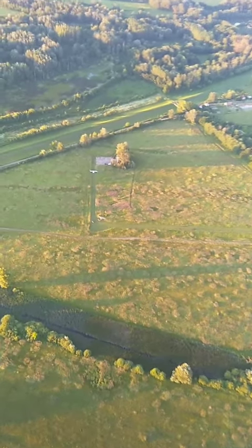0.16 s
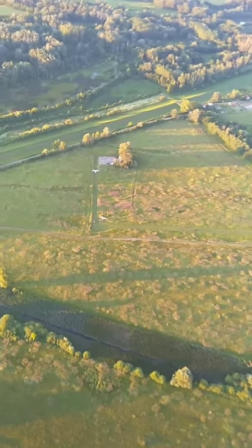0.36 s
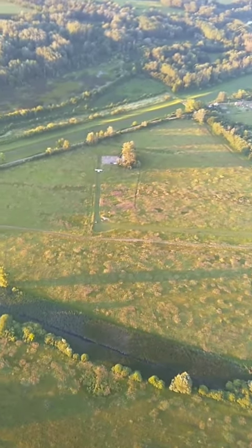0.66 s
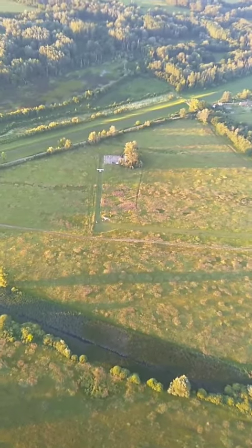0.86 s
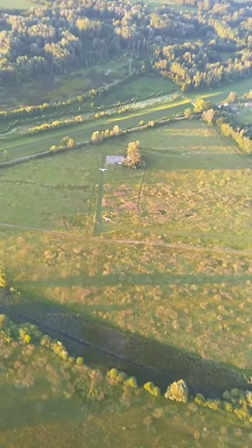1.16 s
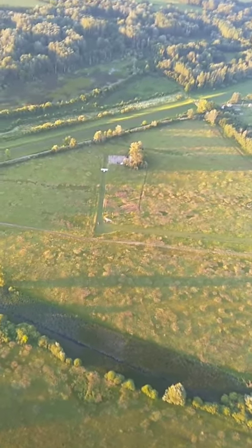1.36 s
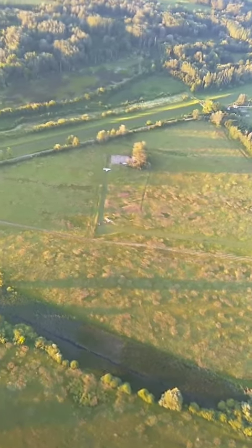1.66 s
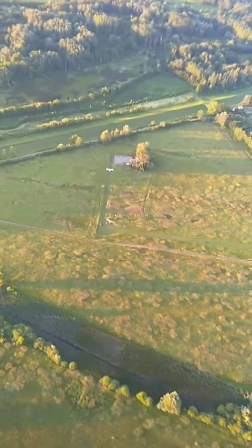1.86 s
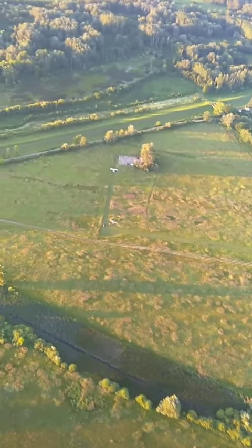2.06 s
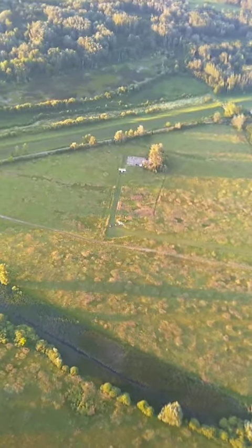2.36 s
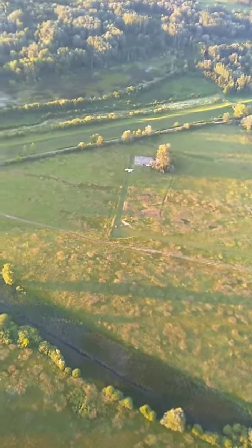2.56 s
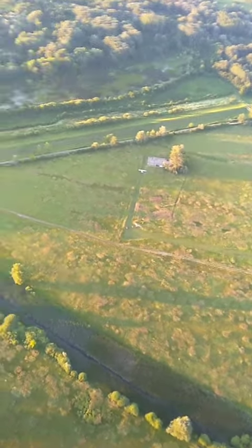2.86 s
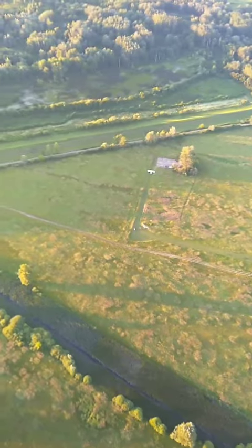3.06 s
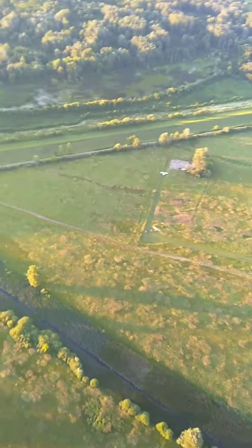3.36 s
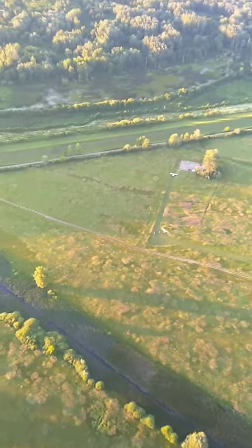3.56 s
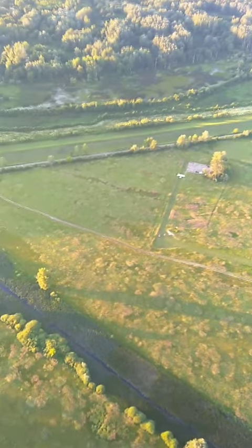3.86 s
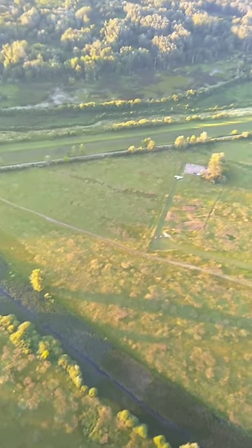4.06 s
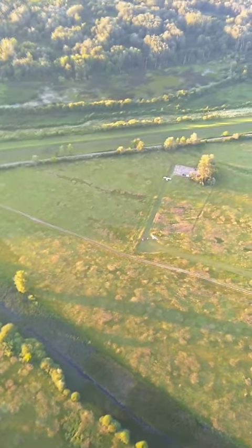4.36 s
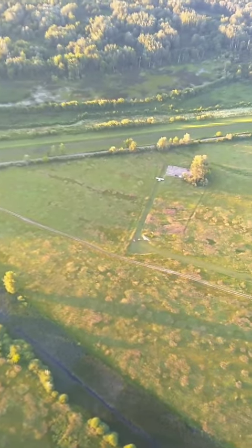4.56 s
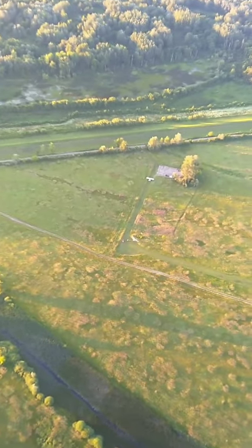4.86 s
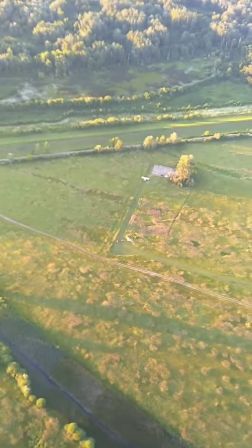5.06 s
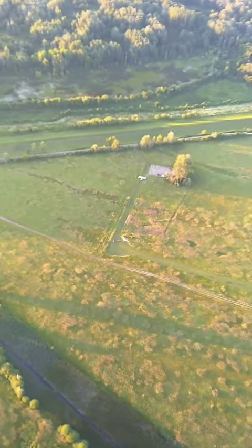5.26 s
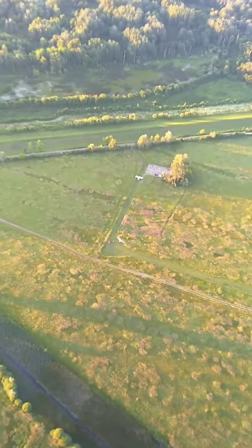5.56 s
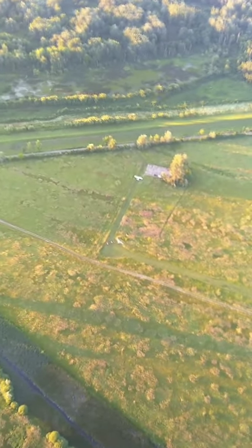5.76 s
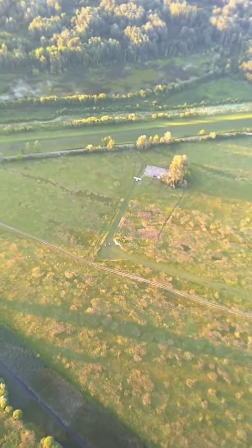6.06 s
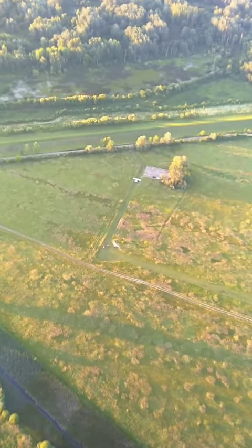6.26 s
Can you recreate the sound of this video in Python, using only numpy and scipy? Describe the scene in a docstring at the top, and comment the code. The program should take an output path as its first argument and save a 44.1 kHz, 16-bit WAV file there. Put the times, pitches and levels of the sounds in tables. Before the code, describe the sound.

A gas burner hisses steadily overhead, then soft wind thumps grow into hard puffs and an unbroken, fluttering, crackling roar of air on the microphone.

```python
"""In the basket of a hot-air balloon, a propane burner hisses overhead, steadily at first.
After a click at the abrupt start, turbulent air reaches the microphone: a few soft thumps, then hard
puffs, then an unbroken, fluttering roar with sharp little cracks, under which the hiss sinks. The hiss
and the smallest eddies are shaped noise, the larger eddies sums of sliding tones, the puffs and cracks
short bursts of tone and noise. A limiter holds the peaks."""
import sys
import numpy as np
from scipy import signal
from scipy.fft import rfft, irfft, next_fast_len
from scipy.io import wavfile
from scipy.ndimage import uniform_filter1d, minimum_filter1d, map_coordinates

SR = 44100
rng = np.random.default_rng(int(sys.argv[2]) if len(sys.argv) > 2 else 0)


def bounce(signal):
    """Save signal as a 16-bit WAV file at the path given by the first command-line argument."""
    frames = np.transpose(np.atleast_2d(signal))
    limited = np.clip(frames, -1, 1)
    pcm = np.round(limited * 32767).astype(np.int16)
    wavfile.write(sys.argv[1], SR, pcm)


N = 282681


def amp(db):
    """Decibels to gain."""
    return 10 ** (np.asarray(db) / 20)


def unit(x):
    """Scaled to rms 1."""
    return x / np.sqrt(np.mean(x ** 2) + 1e-20)


def stereo(mid, side, side_db):
    """Left and right from a middle and a side signal."""
    return mid + amp(side_db) * np.array([side, -side])


def time_around(half_s):
    """Seconds from -half_s to half_s, one per sample."""
    half = int(round(half_s * SR))
    return np.arange(-half, half) / SR


def along(points, hz):
    """(Hz, value) points read on a log frequency axis."""
    point_hz, value = np.transpose(points)
    return np.interp(np.log(hz + 1), np.log(point_hz + 1), value)


def curve(points):
    """(s, value) points read at every sample."""
    point_s, value = np.transpose(points)
    return np.interp(np.arange(N) / SR, point_s, value)


def wobble(rate_hz):
    """Smooth random curve with rate_hz knots a second."""
    knots = rng.standard_normal(int(N * rate_hz / SR) + 4)
    return map_coordinates(knots, [np.arange(N) * rate_hz / SR])


def filtered(x, response):
    """x times a response of frequency, zero-padded against wrap-around."""
    size = next_fast_len(x.shape[-1] + 8192)
    spectrum = rfft(x, size) * response(np.fft.rfftfreq(size, 1 / SR))
    return irfft(spectrum, size)[..., :x.shape[-1]]


def noise(spectrum, side_db):
    """Stereo noise whose middle has rms 1; side_db sets its width."""
    mid, side = filtered(rng.standard_normal((2, N)), lambda hz: amp(along(spectrum, hz)))
    return stereo(unit(mid), unit(side), side_db)


def even(x, span_s):
    """x with its swells slower than span_s smoothed out."""
    size = max(int(span_s * SR), 2)
    power = uniform_filter1d(uniform_filter1d(np.mean(x ** 2, axis=0), size), size)
    return x / np.sqrt(np.abs(power) + 1e-9)


def add(track, start_s, sound):
    """Mix a sound into a track from start_s."""
    start = int(round(start_s * SR))
    lo, hi = max(start, 0), min(start + sound.shape[-1], N)
    track[..., lo:hi] += sound[..., lo - start:hi - start]


ARRIVAL_S, RISE_S = 2.885, 0.018  # onset of the unbroken turbulence
# Strength of the unbroken turbulence. Each row: time in seconds, gain in dB.
FLOW_GAIN = [(2.9, -1), (2.95, -2.5), (2.98, -9), (3.04, 2.5), (3.24, 1), (3.42, -0.5), (3.66, -2),
             (3.88, 2), (4.12, 0), (4.35, 0), (4.54, 0.5), (4.66, -2), (4.8, 1), (4.9, -3.5), (5.02, -1.5),
             (5.22, 0), (5.31, -2.5), (5.53, 2.5), (5.62, -2.5), (5.8, 3), (5.96, -2), (6.1, 0.5),
             (6.28, 1.5), (6.35, 4)]
# Gaps between gusts. Each row: centre in seconds, gain at the centre in dB, half length in seconds.
GUST_GAPS = [(2.978, -15, 0.012), (3.09, -5, 0.011), (3.199, -4.5, 0.011), (3.469, 0, 0.01),
             (3.523, -3, .012), (3.668, -4, 0.0099), (3.755, -3, 0.014), (4.2, -2, 0.0093),
             (4.277, -5.5, 0.011), (4.377, -3.5, .01), (4.51, -5, 0.013), (4.563, -5, 0.013),
             (4.95, 0, 0.0092), (5.223, -8, 0.016), (5.39, -4.5, 0.012), (5.419, -5.5, 0.013),
             (5.542, -7, 0.015), (6.209, -12.5, 0.0099), (6.307, -6, 0.011)]


def flowing():
    """Gain of the turbulence: none at first, then about 1, with gaps between the gusts."""
    flow_db = curve(FLOW_GAIN)
    t = time_around(0.1)
    for centre_s, depth_db, half_s in GUST_GAPS:
        add(flow_db, centre_s + t[0], depth_db * np.exp(-(t / half_s) ** 2))
    onset = np.clip((np.arange(N) / SR - ARRIVAL_S) / RISE_S, 0, 1)
    return onset * amp(flow_db)


# Spectra of the large, middle and small eddies. Each row: frequency in Hz, relative level in dB.
LARGE_SPECTRUM = [(20, -66), (50, -71), (70, -49), (100, -5.5), (130, 5.5), (220, 4.5), (280, -1.5),
                  (380, -18), (700, -72)]
MIDDLE_SPECTRUM = [(120, -62), (230, -3.5), (300, 2.5), (450, -1), (600, -4), (800, -7), (1000, 5),
                   (1250, -9), (2000, -80)]
SMALL_SPECTRUM = [(350, -42), (600, 2), (780, 11), (1000, 3.5), (1400, 0), (2400, -21), (4500, -40),
                  (10000, -45)]
# Upper edge of the roar, swept up by gusts. Each row: time in seconds, highest eddy pitch in Hz.
UPPER_EDGE = [(2.881, 530.0), (2.899, 990), (2.935, 890), (2.971, 1200.0), (2.989, 490.0), (3.007, 1000.0),
              (3.025, 780.0), (3.109, 654), (3.133, 996), (3.169, 670), (3.247, 1110.0), (3.265, 816),
              (3.295, 900.0), (3.336, 583), (3.408, 910.0), (3.444, 565), (3.588, 560.0), (3.618, 790.0),
              (3.672, 570), (3.767, 806), (3.803, 650.0), (3.893, 870), (3.971, 590), (4.049, 890),
              (4.121, 530.0), (4.175, 890), (4.204, 640), (4.576, 588), (4.588, 780.0), (4.665, 620),
              (4.803, 820), (4.869, 750), (4.881, 430.0), (4.899, 730.0), (4.941, 430.0), (5.013, 830.0),
              (5.114, 510.0), (5.138, 870), (5.228, 490.0), (5.258, 760), (5.557, 550), (5.569, 740),
              (5.719, 690.0), (5.857, 720), (5.899, 587), (6.06, 660.0), (6.108, 870), (6.15, 630.0),
              (6.168, 970), (6.21, 580.0), (6.258, 720.0), (6.27, 460), (6.348, 716), (6.407, 674)]
LARGE_DB, MIDDLE_DB = -15.5, -15
SMALL_DB, SMALL_DB_PER_OCTAVE, USUAL_EDGE_HZ = -35.5, 4, 700  # small eddies grow as the edge climbs
SURGE_RATE_HZ, SURGE_DB = 10, 1.8  # random tilt between large and middle eddies
SPURT_RATE_HZ, SPURT_DB = 22, 2  # random swing of the small eddies, and its limit
NARROW_DB, WIDE_DB, SPREAD_S = -47, -1, 1  # side gain at arrival, and SPREAD_S later


def turbulence():
    """Eddies of three sizes; gusts push the roar up in pitch, and the smallest eddies come in spurts."""
    edge_hz = curve(UPPER_EDGE)
    flutter = wobble(90)
    surge_db = SURGE_DB * wobble(SURGE_RATE_HZ)

    large = swarm(LARGE_SPECTRUM, edge_hz, side_db=-17, rate_hz=420) * amp(0.34 * flutter)
    large = even(large, span_s=0.022) * amp(LARGE_DB + surge_db)

    middle = swarm(MIDDLE_SPECTRUM, edge_hz, side_db=-10.5, rate_hz=950) * amp(2 * flutter)
    middle = even(middle, span_s=0.035) * amp(MIDDLE_DB - surge_db)

    small = noise(SMALL_SPECTRUM, side_db=-10.5) * amp(4.8 * flutter + 3.3 * wobble(260))
    small_db = SMALL_DB + SMALL_DB_PER_OCTAVE * np.log2(edge_hz / USUAL_EDGE_HZ)
    spurt_db = SPURT_DB * np.tanh(wobble(SPURT_RATE_HZ))
    small = even(small, span_s=0.019) * amp(small_db + spurt_db)

    left, right = (large + middle + small) * flowing()
    # the flow meets both ports alike at first, then spreads
    width_db = curve([(ARRIVAL_S, NARROW_DB), (ARRIVAL_S + SPREAD_S, WIDE_DB)])
    spread = stereo((left + right) / 2, (left - right) / 2, width_db)
    return spread * amp([[-.4], [.4]])


EDGE_LIFT_DB, EDGE_STEEPNESS = 2, 24  # eddies gather just under the edge and die out above it


def swarm(spectrum, edge_hz, side_db, rate_hz, glide_hz=60, spread_db=2.0, side_top_hz=600):
    """Countless short swells, each sliding in pitch, few far above edge_hz; the middle has rms 1."""
    count = int(rate_hz * N / SR)
    when, pitch, phase = rng.random((count, 3)).T[:, :, None]
    size, slide, stretch = rng.standard_normal((count, 3)).T[:, :, None]
    step, life_s, top_hz = 12, .011, 1200  # swells are computed at every 12th sample
    t = np.arange(-SR // 20, SR // 20, step) / SR
    u = t / (life_s * np.exp(0.38 * stretch))
    pitch_hz = top_hz * pitch
    cycles = pitch_hz * t + glide_hz * slide * u * t / 2 + phase

    height = pitch_hz / edge_hz[(when * N).astype(int)]
    lift = amp(EDGE_LIFT_DB * np.minimum(height, 1) ** 2)
    under_edge = lift / (1 + (height / 0.96) ** EDGE_STEEPNESS)
    strength = under_edge * amp(spread_db * np.clip(size, -2, 2))
    swells = strength * np.exp(-u * u) * np.sin(2 * np.pi * cycles)

    where = (when * N / step).astype(int) + np.arange(len(t))
    coarse = np.bincount(where.ravel(), swells.ravel(), N // step + len(t))
    pressure = signal.resample_poly(coarse, step, 1)[SR // 20:][:N]

    def colour(hz):
        side_cut = 1 + (hz / side_top_hz) ** 6
        return amp(along(spectrum, hz)) / np.array([np.ones_like(hz), side_cut])

    mid, side = filtered(np.array([pressure, rng.standard_normal(N)]), colour)
    side = side * amp(5.4 * wobble(19))  # now and then the two ports differ more
    return stereo(unit(mid), unit(side), side_db)


# Single eddies that stand out; the first two rows are the click of the abrupt start.
# Each row: centre in seconds, rms level in dB, pitch in Hz, length in seconds.
SINGLE_EDDIES = [(0.003, -14.5, 474, 0.0076), (0.01, -18, 680, 0.0067), (0.055, -34, 138.5, 0.012),
                 (0.076, -27, 271, 0.011), (0.179, -26, 455, 0.014), (0.294, -27, 234.5, 0.013),
                 (0.841, -31, 314, 0.012), (1.194, -25.5, 388.5, 0.019), (1.24, -27, 485, 0.014),
                 (1.238, -31, 1107, 0.014), (1.258, -28.5, 118, 0.024), (1.408, -32, 340, 0.023),
                 (1.477, -31, 178, 0.009), (1.505, -37.5, 285, 0.015), (1.593, -21, 141, 0.025),
                 (1.749, -31, 267, 0.014), (1.924, -22, 450, 0.0029), (1.95, -22, 600, 0.006),
                 (1.958, -20, 1070, 0.0037), (1.964, -12, 400, 0.0024), (1.972, -20.5, 232, 0.014),
                 (1.992, -3.5, 330.4, 0.01), (2.009, -20, 890, 0.02), (2.013, -16.5, 366.4, 0.025),
                 (2.023, -8, 376.6, 0.005), (2.042, -15, 834.6, 0.014), (2.043, -6, 353, 0.0055),
                 (2.052, -26, 137.4, 0.052), (2.114, -22.5, 1440, 0.0028), (2.258, -24, 603, 0.023),
                 (2.28, -20, 1423, 0.0049), (2.297, -15, 292.6, 0.024), (2.326, -17, 393, 0.0036),
                 (2.435, -22.5, 513, 0.038), (2.456, -29.5, 1650, 0.0072), (2.461, -19, 800, 0.019),
                 (2.463, -22, 560, 0.022), (2.493, -12, 331.6, 0.007), (2.503, -3.5, 402.7, 0.0065),
                 (2.514, -14, 749, 0.029), (2.523, -13.5, 416, 0.0098), (2.514, -9.5, 128, 0.03),
                 (2.629, -13, 472, 0.019), (2.649, -17, 148.1, 0.045), (2.655, -18.5, 381, 0.026),
                 (2.71, -20, 389, 0.0355), (2.732, -14, 452, 0.0099), (2.753, -16, 395, 0.055),
                 (2.766, -7.5, 216.3, 0.013), (2.78, -22, 800, 0.023), (2.813, -29.5, 2800, 0.003),
                 (2.845, -26.5, 1160, 0.017), (2.775, -12, 536, 0.018), (2.788, -19.5, 218.3, 0.076),
                 (2.856, -8, 371, 0.0031), (2.867, -8, 291.7, 0.0063), (2.884, -20.5, 187.5, 0.022),
                 (2.91, -15.5, 337.6, 0.024), (2.935, -10, 349, 0.05), (2.947, -18, 592, 0.014),
                 (2.957, -16.5, 974, 0.021), (2.969, -23.5, 2470, 0.0067), (3.019, -8.5, 394, 0.015),
                 (3.019, -12, 218.4, 0.019), (3.051, -19, 280, 0.011), (3.112, -11, 167, 0.013),
                 (3.131, -11, 560, 0.021), (3.162, -5.5, 236.4, 0.011), (3.23, -14.5, 780, 0.026),
                 (3.309, -15, 447, 0.031), (3.43, -11, 417.7, 0.0099), (3.495, -10, 236.2, 0.022),
                 (3.572, -12.5, 290.7, 0.019), (3.623, -8.5, 460, 0.03), (3.701, -16, 505, 0.016),
                 (3.821, -13.5, 300, 0.032), (3.886, -16, 720, 0.024), (4.039, -16, 355, 0.018),
                 (4.072, -8.5, 247, 0.034), (4.227, -11.5, 282, 0.033), (4.311, -8.5, 277, 0.027),
                 (4.395, -9, 329, 0.0068), (4.466, -10, 335.7, 0.013), (4.593, -11, 197, 0.025),
                 (4.646, -10.5, 155.7, 0.017), (4.681, -15, 530, 0.02), (4.687, -13.5, 175.3, 0.013),
                 (4.72, -15.5, 592, 0.031), (4.759, -12.5, 198, 0.03), (4.795, -16, 800, 0.019),
                 (4.806, -7.5, 330.7, 0.014), (4.849, -12, 282.7, 0.039), (4.978, -13.5, 153.5, 0.055),
                 (5.011, -12, 236, 0.025), (5.093, -8, 315, 0.03), (5.137, -18, 374, 0.021),
                 (5.182, -17.5, 500, 0.018), (5.29, -11.5, 444, 0.0316), (5.351, -10, 474, 0.024),
                 (5.402, -8, 171, 0.014), (5.447, -8, 212, 0.02), (5.488, -11, 377, 0.024),
                 (5.664, -10, 315.2, 0.03), (5.737, -17, 393, 0.028), (5.759, -14, 235.6, 0.02),
                 (5.844, -16.5, 515.6, 0.033), (5.875, -13, 333, 0.058), (6.028, -13, 211.6, 0.019),
                 (6.061, -11.5, 375, 0.014), (6.106, -16, 720, 0.01), (6.14, -6.5, 312.4, 0.012),
                 (6.24, -8.5, 444.6, 0.013), (6.338, -11, 550, 0.015), (6.394, -5, 238.3, 0.023)]


def puffs(width=0.29, skirt=4, clean_cycles=9, glide=0.091, side_db=-26):
    """Each row is a short swell of pressure around its own pitch; long ones break up into noise."""
    out, t = np.zeros((2, N)), time_around(0.1)
    for centre_s, level_db, pitch_hz, length_s in SINGLE_EDDIES:
        def band(hz):
            return (1 + (np.log((hz + 1) / pitch_hz) / width) ** 2 / skirt) ** -skirt

        rough, side = unit(filtered(rng.standard_normal((2, len(t))), band))
        sliding_hz = pitch_hz * (1 + glide * rng.standard_normal() * np.tanh(t / length_s))
        clean = unit(np.sin(2 * np.pi * (np.cumsum(sliding_hz) / SR + rng.random())))
        mid = clean + rough * pitch_hz * length_s / clean_cycles
        swell = np.exp(-(1.57 * t / length_s) ** 2)
        energy_gain = np.sqrt(length_s * SR / len(t))  # makes the level an rms over length_s
        puff = stereo(unit(mid * swell), unit(side * swell), side_db) * energy_gain
        add(out, centre_s + t[0], amp(level_db) * puff)
    return out


# Single cracks at the ports; the first row belongs to the click at the abrupt start. Each row: centre in
# seconds, body level in dB, body pitch in Hz, bright level in dB, length in seconds.
SINGLE_CRACKS = [(0.047, -17, 660, -27, 0.0017), (1.221, -22, 553, -40, .003),
                 (1.358, -25, 750, -42, 0.0022), (1.416, -18, 490, -42, 0.0031),
                 (1.945, -10, 680, -33, 0.0011), (1.961, -5.5, 850, -24, 0.00082),
                 (1.992, -15, 900, -23.5, 0.0035), (2.021, -9.5, 800, -30, 0.0017),
                 (2.045, -15, 1580, -24, 0.0019), (2.052, -18, 1530, -25, 0.002),
                 (2.114, -10, 830, -25, 0.00059), (2.28, -20, 650, -31, 0.004),
                 (2.302, -8.5, 458, -32, 0.0014), (2.428, -10.5, 600, -30, 0.00062),
                 (2.454, -6, 730, -21, 0.00046), (2.462, -14, 810, -34, 0.0021),
                 (2.504, -16, 844, -23, 0.0032), (2.621, -22, 650, -34, 0.0017),
                 (2.774, -14.5, 750, -33, 0.0013), (2.815, -7.5, 1100, -20, 0.0011),
                 (2.904, -2, 597, -34, 0.00085), (2.974, -17.5, 1134, -25.5, 0.0058),
                 (3.007, -16, 650, -23, 0.0019), (3.034, -9, 450, -25, 0.0021),
                 (3.073, -4, 535, -34, 0.0024), (3.13, -11.5, 750, -25, 0.0029),
                 (3.231, -25, 1110, -28, .003), (3.243, -23, 1230, -30.5, 0.0074),
                 (3.508, -15, 600, -33, 0.0011), (3.569, -15, 620, -31, .0014),
                 (3.353, -15, 640, -41, .0015), (3.689, -18, 560, -42, .002),
                 (3.837, -12, 580, -47, 0.0022), (3.919, -8, 554, -43, 0.0021),
                 (4.053, -20.5, 970, -36, 0.0028), (4.161, -10, 555, -46, 0.0024),
                 (4.463, -10, 544, -28, 0.0024), (4.595, -14, 640, -34, 0.0025),
                 (4.622, -23, 700, -28, .0012), (4.663, -24.5, 1230, -27, 0.0035),
                 (4.676, -15, 600, -30, 0.0009), (4.71, -13, 570, -30, .002),
                 (4.787, -19, 850, -30, 0.0012), (4.855, -20, 800, -28.5, 0.0021),
                 (4.899, -21, 1060, -41, 0.0035), (4.926, -25, 1150, -23, 0.0016),
                 (5.013, -13.5, 800, -32, 0.0021), (5.033, -12, 600, -24.5, 0.0016),
                 (5.253, -18.5, 754, -29.5, 0.0012), (5.284, -14, 600, -29, 0.00094),
                 (5.576, -13.5, 660, -39, 0.0024), (5.675, -10, 620, -34, 0.0017),
                 (5.719, -21, 700, -34, .0012), (5.78, -23, 700, -31, .0015),
                 (5.838, -6, 584, -22.5, 0.0014), (5.879, -14, 656, -31, 0.0022),
                 (6.061, -18, 600, -26, .001), (6.096, -16, 740, -38, .0025),
                 (6.17, -13.5, 855, -37, 0.0029), (6.25, -13, 606, -29, 0.003),
                 (6.334, -13, 550, -29.5, 0.0025)]
# Noise spectra of a crack's body and bright part. Each row: frequency in Hz, relative level in dB.
BODY_SPECTRUM = [(250, -39), (550, 18), (1000, 8), (1700, 3), (2600, -11), (3500, -33), (5000, -28)]
BRIGHT_SPECTRUM = [(1500, 15), (2700, 15), (4000, 6.5), (6000, -4.5), (12000, -18)]
STRAY_RATE_HZ, STRAY_DB, STRAY_SPREAD_DB, STRAY_BRIGHT_DB = 16, -16, 1, -32.5
STRAY_LENGTH_S, STRAY_HZ = 0.001, 670  # pitch is the middle of one octave
BODY_ROUGHNESS = 0.36  # gain of the noise in the body


def stray_cracks():
    """More cracks at random times in the roar, in rows like the single ones."""
    roar_s = N / SR - ARRIVAL_S
    rows = []
    for when, size, high in rng.random((int(STRAY_RATE_HZ * roar_s), 3)):
        level_db = STRAY_DB + STRAY_SPREAD_DB * (2 * size - 1)
        pitch_hz = STRAY_HZ * 2 ** (high - .5)
        rows.append((ARRIVAL_S + when * roar_s, level_db, pitch_hz, STRAY_BRIGHT_DB, STRAY_LENGTH_S))
    return rows


def cracks():
    """Where the flow tears off the ports it snaps, each time at its own pitch: tone, noise, bright noise."""
    body, rough, bright = np.zeros((3, N))
    t = time_around(0.04)
    for centre_s, level_db, pitch_hz, bright_db, length_s in list(SINGLE_CRACKS) + stray_cracks():
        snap = np.exp(-(t / length_s) ** 2)
        tone = np.sqrt(2) * np.sin(2 * np.pi * (pitch_hz * t + rng.random()))
        add(body, centre_s + t[0], amp(level_db) * snap * tone)
        add(rough, centre_s + t[0], amp(level_db) * snap * BODY_ROUGHNESS)
        add(bright, centre_s + t[0], amp(bright_db) * snap)
    rough_noise = rough * noise(BODY_SPECTRUM, side_db=-40)
    bright_noise = bright * even(noise(BRIGHT_SPECTRUM, side_db=-35), span_s=0.0047)
    # too brief to carry any bass
    return filtered(body + rough_noise + bright_noise, lambda hz: hz ** 2 / (hz ** 2 + 200 ** 2))


CRACKLE_DB, CRACKLE_BRIGHT_DB = -31, -18  # bright part relative to the body


def crackle(rate_hz=105, life_s=0.00078):
    """Countless tiny cracks ride on the roar: random hits, each a brief pulse of noise."""
    scatter_db = 4 * np.clip(rng.standard_normal(N), -2, 1.5)
    hits = (rng.random(N) < rate_hz / SR) * amp(scatter_db) * flowing()
    t = np.arange(SR // 100) / SR
    pulse = t / life_s * np.exp(1 - t / life_s)
    envelope = signal.fftconvolve(hits, pulse)[:N]
    body = noise(BODY_SPECTRUM, side_db=-46)
    bright = amp(CRACKLE_BRIGHT_DB) * noise(BRIGHT_SPECTRUM, side_db=-51)
    return envelope * amp(CRACKLE_DB) * (body + bright)


# Hiss of the burner, sinking and returning under the roar. Each row: time in seconds, level in dB.
HISS_LEVEL = [(0, -30), (1.98, -29.5), (2.04, -32.5), (2.12, -29), (2.72, -28.5), (2.9, -32), (3.0, -30.5),
              (3.17, -34), (3.33, -38), (3.55, -32.5), (4.1, -32), (4.3, -37), (4.52, -30), (4.72, -35),
              (5.02, -32.5), (5.54, -30), (5.62, -37.5), (5.77, -30.5), (5.9, -35.5), (6.02, -33),
              (6.41, -31.5)]
# Spectra of the rush, the fizz and the topmost hiss. Each row: frequency in Hz, relative level in dB.
RUSH_SPECTRUM = [(35, -44), (70, -41), (125, -9), (240, -14), (360, -14), (440, 7), (700, 0), (1200, -1.5),
                 (1600, -7.5), (2200, -7), (3300, -16), (4700, -22.5), (8000, -32), (15000, -35.5)]
FIZZ_SPECTRUM = [(3500, -50), (4400, -1), (4800, 0), (6000, 4.5), (8500, -6), (11500, 5), (13500, -0.5),
                 (15400, -8)]
SHEEN_SPECTRUM = [(9000, -32), (11500, -1), (13000, 4), (15400, -9)]
# Hollow resonances of burner and frame. Each row: centre in Hz, width in Hz, boost in dB.
RESONANCES = [(421, 19, 3), (823, 23, 3.5), (1133, 14.4, 7.5), (2060, 72, 1.5)]
# Swell of the topmost hiss. Each row: time in seconds, level in dB.
SHEEN_LEVEL = [(3.3, -87), (3.55, -59), (3.72, -51), (4.0, -56), (4.5, -70)]
FIZZ_START_DB, FIZZ_DB_PER_HISS_DB = -52, 0.89


def burner():
    """The gas jet: a narrow rush coloured by the frame and a wide fizz on top; for a while the topmost hiss
    grows brighter."""
    def hollow(hz):
        boosts = [boost_db / (1 + ((hz - centre_hz) / width_hz * 2) ** 2)
                  for centre_hz, width_hz, boost_db in RESONANCES]
        return amp(sum(boosts))

    hiss_db = curve(HISS_LEVEL)
    rush = unit(filtered(noise(RUSH_SPECTRUM, side_db=-56), hollow))
    rush = rush * amp(hiss_db + 0.94 * wobble(24.8))
    fizz_db = FIZZ_START_DB + FIZZ_DB_PER_HISS_DB * (hiss_db - hiss_db[0])
    fizz = noise(FIZZ_SPECTRUM, side_db=0.0) * amp(fizz_db)
    sheen = noise(SHEEN_SPECTRUM, side_db=-3) * amp(curve(SHEEN_LEVEL))
    return rush + fizz + sheen


def scene():
    """The moving air at the microphone and the burner."""
    return turbulence() + puffs() + cracks() + crackle() + burner()


def record(dry, ceiling=0.75, attack_s=0.0085, release_db_per_s=70, top_hz=15450):
    """A limiter dives at each peak and recovers at a steady rate; nothing is kept above top_hz."""
    excess_db = 20 * np.log10(np.maximum(np.abs(dry).max(axis=0) / ceiling, 1))
    recovery_db = release_db_per_s * np.arange(N) / SR
    gain_db = recovery_db - np.maximum.accumulate(excess_db + recovery_db)
    size = max(int(attack_s * SR), 2)
    gain = uniform_filter1d(minimum_filter1d(amp(gain_db), size), size)
    return filtered(dry * gain, lambda hz: hz < top_hz)


dry = scene()
out = record(dry)
bounce(out)
```